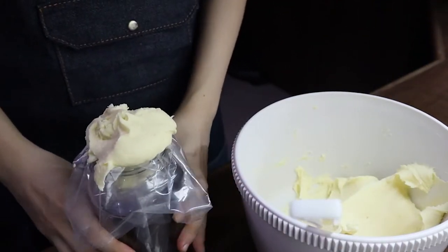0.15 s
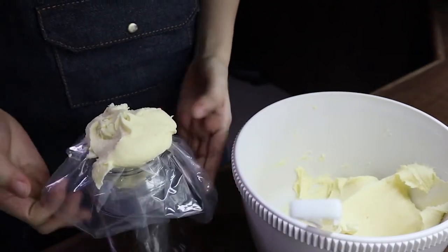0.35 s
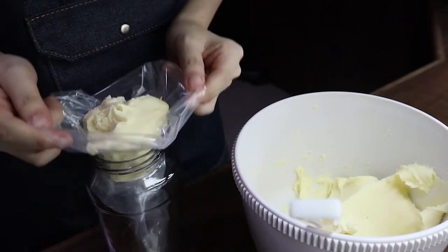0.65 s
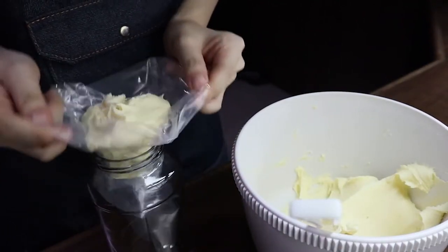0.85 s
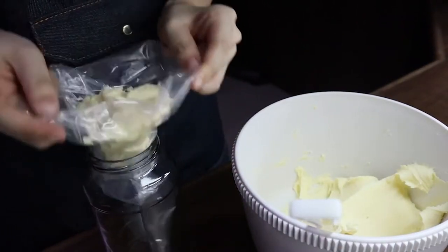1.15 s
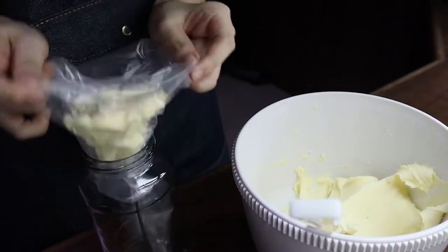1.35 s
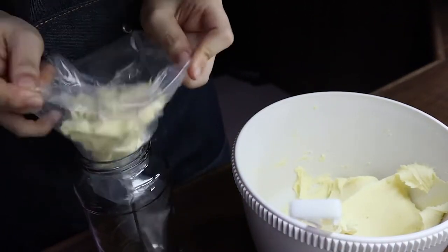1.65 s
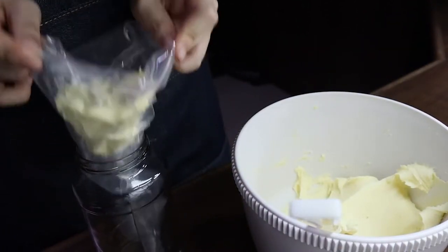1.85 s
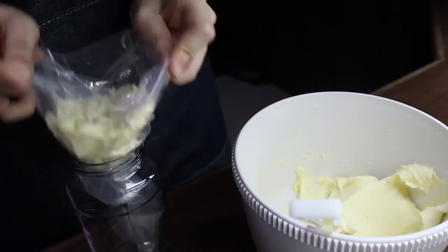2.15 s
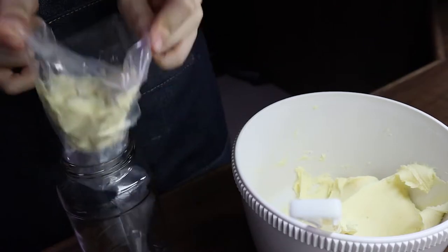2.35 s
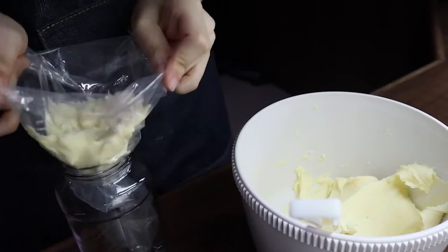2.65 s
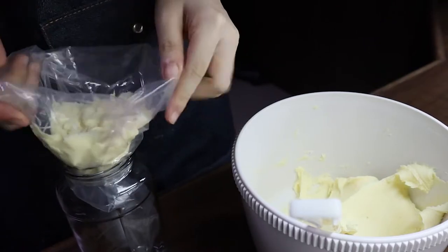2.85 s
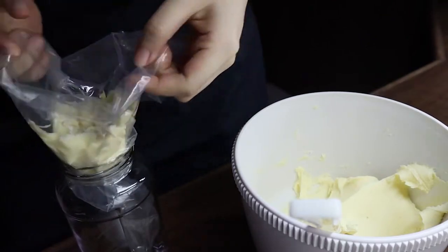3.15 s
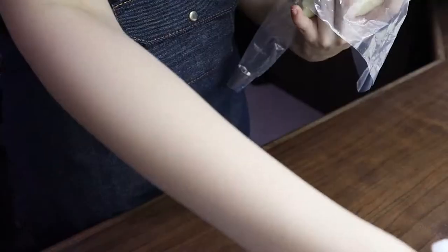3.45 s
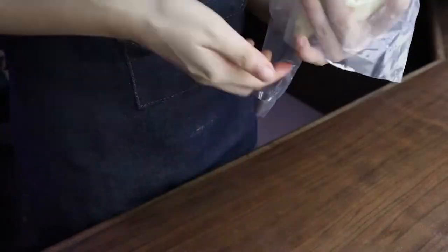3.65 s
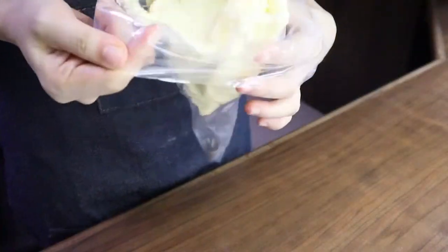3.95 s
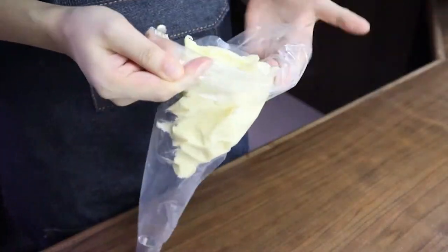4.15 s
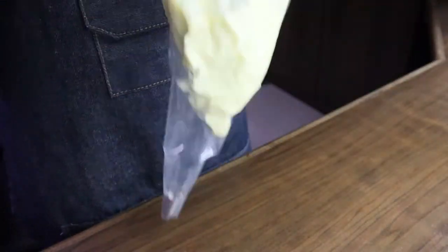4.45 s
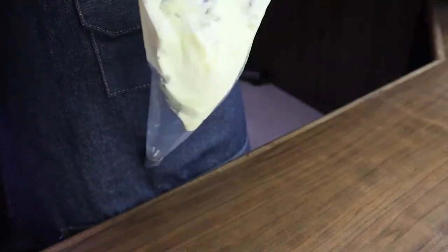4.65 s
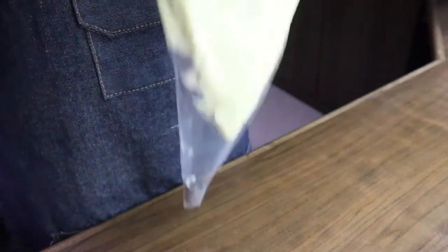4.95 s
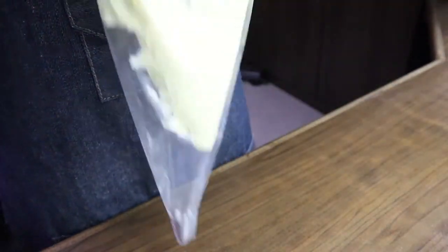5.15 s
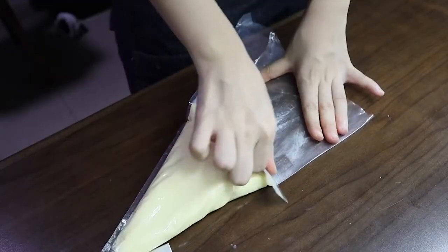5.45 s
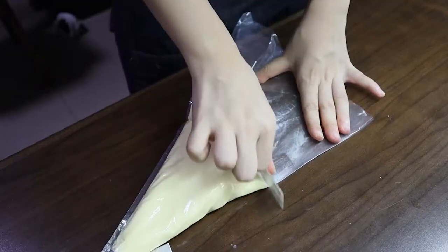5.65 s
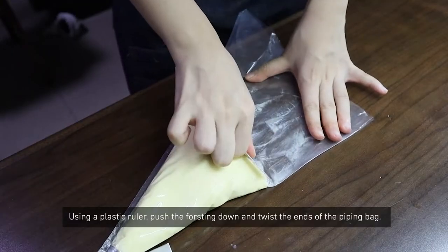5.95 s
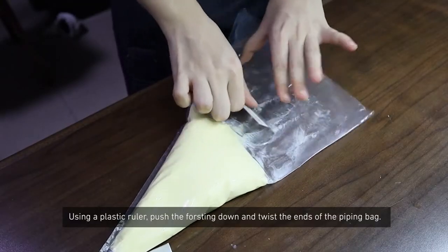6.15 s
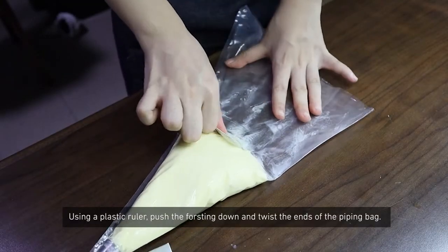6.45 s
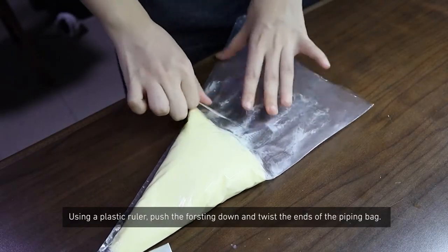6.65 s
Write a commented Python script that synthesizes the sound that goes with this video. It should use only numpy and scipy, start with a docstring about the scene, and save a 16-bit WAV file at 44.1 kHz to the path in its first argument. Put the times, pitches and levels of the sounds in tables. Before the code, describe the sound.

A jar knocks dully on a wooden table, with two heavy thumps at once. A thin plastic piping bag then rustles lightly and crinkles more densely over a low rumble. After a brief lull with soft bumps, it crackles loudly as it is shaken, then subsides to faint separate crinkles. Close stereo microphone, small kitchen, light background noise.

```python
"""A small kitchen: a thin plastic piping bag is pulled off a jar, shaken down and pressed flat on a wooden table.
Creases in the film buckle as bursts of uneven slips ringing a panel, over a bed of tiny crackles.
Dull noise-burst knocks, soft low bumps, a lumpy rumble through jar and table and background noise lie around them.
Diffuse echoes follow the bag and the knocks; two close microphone ports, a mains-hum filter, overload
and treble cuts shape the pickup.
"""
import sys
import numpy as np
from scipy import signal
from scipy.fft import rfft, irfft
from scipy.io import wavfile
from scipy.ndimage import uniform_filter1d

SR = 44100
rng = np.random.default_rng(int(sys.argv[2]) if len(sys.argv) > 2 else 0)


def store_pcm(level_fs):
    """Save levels as 16-bit WAV."""
    pcm = np.round(np.clip(level_fs, -1, 1) * 32767).astype(np.int16)
    wavfile.write(sys.argv[1], SR, np.atleast_2d(pcm).T)


N = 300321

# colour of the background noise: (pitch [Hz], relative level per Hz [dB])
BACKGROUND_COLOUR = [(15, -33), (25, -5.5), (97, 0.5), (361, -16.5), (641, -12), (2310, -20),
                     (10800, -46.5), (13000, -51)]
# background noise over time: (time [s], level [dB])
BACKGROUND_LEVEL = [(0, -31.5), (.4, -64), (1, -51.5), (3.6, -48.5), (5.5, -46.5), (6.81, -45)]
# jar knocks on the table: (time [s], drive level [dB], burst t60 [s])
JAR_KNOCKS = [(0.002, -10, 0.15), (0.101, 0.5, 0.034), (0.21, -12.5, 0.095), (0.778, -15.5, 0.072),
              (2.218, -13, 0.081)]
# colour of a knock: (pitch [Hz], relative level per Hz [dB])
KNOCK_COLOUR = [(41, -52), (70, 1), (572, 3.5), (1140, -2.5), (2040, -12), (4490, -28.5), (7000, -61.5),
                (9100, -88), (15400, -120)]
# colour of the rumble: (pitch [Hz], relative level per Hz [dB])
RUMBLE_COLOUR = [(15, -38), (25, -9), (54, -12.5), (144, 2), (426, -0.5), (560, -5), (1200, -12),
                 (1560, -11.5), (2640, -120)]
# rumble through jar and table, before its lumps: (time [s], level [dB])
RUMBLE_LEVEL = [(.3, -66), (.95, -48.5), (1.3, -39), (1.6, -30), (2.2, -31), (2.72, -31), (2.85, -50.5),
                (3.4, -50.5), (3.8, -58), (4.45, -47), (4.55, -30.5), (4.75, -64.5), (5.1, -42.5),
                (5.4, -38.5), (5.5, -67), (6.81, -70)]
# spells of handling, each a run of crackle: (start [s], end [s], drive at start [dB], drive at end [dB])
HANDLING_SPELLS = [(0.395, .49, -43.5, -43), (0.527, 0.645, -29.5, -38.5), (0.734, 0.727, -47, -42),
                   (0.814, 0.943, -39, -48.5), (1.0, 2.698, -33, -25), (2.727, 2.996, -28, -51.5),
                   (2.992, 3.155, -42.5, -25.5), (3.23, 3.306, -35, -35.5), (3.365, 3.462, -29, -34.5),
                   (3.5, 3.585, -64, -44.5), (3.77, 3.824, -43.5, -34), (3.877, 4.275, -21, -39),
                   (4.37, 4.36, -24, -28), (4.446, 4.442, -17, -36), (4.505, 4.852, -33, -31.5),
                   (4.892, 5.37, -27.5, -30.5), (5.47, 5.595, -35, -57), (5.828, 5.913, -41.5, -37),
                   (6.083, 6.197, -42.5, -40), (6.305, 6.436, -27.5, -44), (6.567, 6.77, -35, -35.5)]
# centre of the crackle's pitch spread: (time [s], pitch [Hz])
CRACKLE_CENTRE = [(0, 2320), (1, 2340), (2.6, 2040), (3, 2360), (5.4, 2040), (5.6, 2580)]
# creases that snap at once: (time [s], panel level [dB], panel pitch [Hz], treble level [dB])
CREASE_SNAPS = [(0.426, -36, 2240, -36), (.449, -36, 2510, -40), (0.5029, -37, 2140, -28),
                (0.58, -26.5, 2300, -24), (0.5422, -29.5, 2150, -33), (0.632, -29, 2460, -32),
                (0.7239, -32, 2280, -27.5), (.836, -20, 2660, -21), (0.8944, -29.5, 2430, -27.5),
                (0.992, -30, 3300, -19), (1.1236, -22.5, 1770, -19), (1.2351, -28.5, 2500, -35.5),
                (1.3543, -26.5, 1650, -47), (1.394, -25, 1650, -23), (1.446, -19.5, 2060, -20),
                (1.4525, -23.5, 2480, -16.5), (1.6963, -17.5, 2400, -21.5), (1.8195, -14, 2420, -16),
                (1.893, -13, 1750, -39), (2.0221, -10, 2120, -34), (2.036, -29, 1990, -21),
                (2.1395, -20, 1620, -23.5), (2.181, -24.5, 2490, -41), (2.2792, -14.5, 2310, -12),
                (2.316, -20.5, 1890, -30), (2.3527, -15, 1500, -26), (2.4301, -14, 1990, -23),
                (2.5235, -15, 1950, -11), (2.6078, -15.5, 1880, -11.5), (2.6351, -14, 1790, -11),
                (2.686, -14, 2200, -9.5), (2.9248, -24.5, 1170, -29.5), (3.018, -26.5, 2660, -28),
                (3.032, -30, 2670, -20), (3.0853, -24.5, 2650, -25), (3.103, -27, 2480, -33),
                (3.1196, -17, 2480, -21.5), (3.2481, -21.5, 3100, -23.5), (3.284, -27, 3340, -28),
                (3.3, -41, 2830, -27), (3.3693, -30, 2420, -16.5), (3.4065, -23, 2740, -15.5),
                (3.463, -26, 2700, -33), (3.8376, -22.5, 2110, -19), (3.9102, -14.5, 2140, -20),
                (3.942, -19, 1870, -35), (3.9659, -13.5, 2450, -24), (4.0021, -15, 2200, -22),
                (4.0374, -19, 2550, -17.5), (4.0607, -15, 2200, -34), (4.1139, -19.5, 2540, -19.5),
                (4.273, -17.5, 3230, -19), (4.323, -16, 2380, -24), (4.419, -15.5, 2600, -19),
                (4.49, -12.5, 2160, -17.5), (4.528, -11, 2600, -30), (4.462, -12, 2570, -22),
                (4.6649, -18, 2050, -36), (4.706, -20.5, 2440, -42), (4.87, -20.5, 2670, -24.5),
                (4.9151, -14, 2570, -32), (4.9906, -10, 2020, -14.5), (4.981, -18, 2300, -35),
                (5.001, -19, 2300, -24), (5.1942, -12, 2210, -40), (5.2111, -10.5, 1830, -14),
                (5.318, -4, 1980, -16), (5.36, -11.5, 2320, -25), (5.404, -15.5, 1500, -28),
                (5.8263, -31, 2800, -27), (5.9141, -23.5, 2630, -49), (6.072, -48, 1920, -24.5),
                (6.088, -34, 2630, -25), (6.1111, -22, 2430, -22.5), (6.314, -19, 2840, -40),
                (6.3464, -53, 2920, -25), (6.4102, -38.5, 3540, -25.5), (6.6278, -26.5, 2340, -33),
                (6.74, -17.5, 2500, -24), (6.78, -24.5, 2420, -42)]
# creases that swell to a peak:
# (peak time [s], panel level [dB], panel pitch [Hz], treble level [dB], fall t60 [s])
CREASE_CRUMPLES = [(1.319, -25.5, 2200, -27, 0.03), (1.496, -20.5, 2200, -48, .024),
                   (1.526, -21.5, 2000, -35, 0.021), (1.5723, -16, 1720, -27, 0.028),
                   (1.6522, -20.5, 1580, -32, .025), (1.7396, -14.5, 2100, -44, 0.031),
                   (1.87, -20.5, 2320, -30, 0.075), (1.979, -13, 1970, -19, 0.058),
                   (2.0537, -15, 1890, -25, 0.03), (2.1003, -22.5, 1920, -46, 0.031),
                   (2.2188, -12, 1990, -23, 0.027), (2.3672, -29, 2150, -14.5, 0.023),
                   (2.3998, -13.5, 1930, -29, 0.042), (2.4749, -15, 1930, -24.5, 0.048),
                   (2.5573, -14, 1470, -22, .036), (3.216, -33.5, 3440, -27, 0.042),
                   (4.2099, -20, 2800, -22.5, 0.043), (4.3396, -4, 2430, -5, 0.025),
                   (4.4291, -9.5, 1730, -24, .028), (4.5075, -6, 1740, -16, 0.055),
                   (4.5714, -8, 1800, -16.5, 0.018), (4.633, -13.5, 1980, -20, 0.025),
                   (4.957, -8.5, 1610, -18, 0.046), (5.044, -8, 1750, -24.5, 0.052),
                   (5.1006, -8.5, 2080, -20, 0.024), (5.1635, -4, 2180, -9.5, .027),
                   (5.2468, -9.5, 1980, -19.5, 0.071), (5.2768, -14.5, 2320, -23, 0.022),
                   (5.332, -12, 1500, -26, 0.064), (5.3894, -5.5, 1840, -13, 0.03),
                   (5.463, -19.5, 2750, -29, 0.02), (5.8862, -28.5, 3050, -30.5, 0.064),
                   (6.332, -30.5, 2830, -41, .05), (6.685, -28, 2480, -29.5, 0.027),
                   (6.744, -19.5, 2570, -31, 0.08)]
# where the bag is held: (time [s], left minus right [dB])
BAG_LEAN = [(0, -0.7), (2.6, .5), (4, -0.7), (6.81, -1.8)]
# soft bumps of bowl, filling and hands: (time [s], drive level [dB], pitch [Hz], t60 [s])
SOFT_BUMPS = [(3.487, -25.5, 370, 0.11), (3.546, -33, 350, 0.1), (3.582, -27.5, 282, 0.047),
              (4.497, -29, 91, 0.21), (4.975, -24, 34.5, 0.17), (5.041, -23, 71, 0.28),
              (5.113, -33, 113, 0.36), (6.275, -33.5, 49.6, .2)]

CRACK_DB, CRACK_T60_S = -27.5, 0.012   # bright edge of a knock, relative to its drive level
KITCHEN_T60_S, WALL_CUT_HZ = 0.2, 6600
BAG_ECHO_DB, KNOCK_ECHO_DB = -14, -6   # sends into the kitchen echoes
CRACKLES = 6000   # count
SWELL_DB_PER_S, FADE_DB_PER_S, REST_DB = 399, 330, -61.5   # crackle drive before, after and between spells
SNAP_RISE_T60_S, SNAP_FALL_T60_S = 0.0046, 0.016
CRUMPLE_RISE = 0.71   # rise time over fall time
GENTLE_NARROWS = 1.0357   # a crease rings this many times narrower for each dB it is gentler
GIVE_DB = 14   # the slip as a crease gives way, above a typical other slip
NEIGHBOUR_DB, NEIGHBOUR_OCTAVES = -4, 0.64   # neighbouring panel: gain and random pitch spread
PORT_RING_HZ, PORT_RING_Q = 10300, 3.5
PORT_TURN_RAD, PORT_APART_HZ = 0.85, 3500   # left-right phase spread, reached well above this pitch
MAINS_HZ, NOTCH_WIDTH_HZ = 60, 24.7
CUTOFF_HZ = 13200


def from_db(db):
    """dB to gain."""
    return 10 ** (np.asarray(db) / 20)


def rms_one(x):
    """Scale to rms 1."""
    return x / np.sqrt(np.mean(x ** 2) + 1e-20)


def butter(x, hz, kind, order=2):
    """Butterworth filter along time."""
    return signal.sosfilt(signal.butter(order, hz, kind, fs=SR, output="sos"), x)


def coloured(x, tone):
    """Give white noise the spectrum of a colour table, joined along log pitch."""
    hz, db = np.transpose(tone)
    grid = np.arange(N // 2 + 1) * SR / N + 1
    gain = from_db(np.interp(np.log(grid), np.log(hz), db))
    return irfft(rfft(x) * gain, N)


def ports(hz_apart):
    """White noise that both ports nearly share in the bass and hear differently in the treble."""
    mid, side = rng.standard_normal((2, N))
    difference = butter(side, hz_apart, "high", order=1) + from_db(-27) * side
    return mid + difference * [[1], [-1]]


def background_noise():
    """Background: coloured noise that sinks quickly after the first knocks, partly recovers, then rises slowly."""
    level_db = np.interp(np.arange(N) / SR, *np.transpose(BACKGROUND_LEVEL))
    return from_db(level_db) * rms_one(coloured(ports(4900), BACKGROUND_COLOUR))


def knocks():
    """Dull blows: coloured noise that starts within a millisecond or two and dies fast, with a bright edge."""
    t, envelope, edge = np.arange(N) / SR, np.zeros(N), np.zeros(N)
    for s, drive_db, t60 in JAR_KNOCKS:
        envelope += (t >= s) * from_db(drive_db - 4.0 - 60 * np.abs(t - s) / t60)
        edge += (t >= s) * from_db(drive_db + CRACK_DB - 60 * np.abs(t - s) / CRACK_T60_S)
    crack = edge * rms_one(butter(ports(6400), [1200, 4500], "band"))
    soft_attack = butter(envelope, 290, "low")
    return soft_attack * rms_one(coloured(ports(7700), KNOCK_COLOUR)) + crack


def kitchen(x):
    """Diffuse echoes that start after 4 ms and die away, dulled by the walls."""
    t = np.arange(SR // 2) / SR
    tail = butter(ports(7900)[:, :len(t)], WALL_CUT_HZ, "low", order=1)
    tail = tail * from_db(-60 * t / KITCHEN_T60_S) * (t > .004)
    return signal.fftconvolve(x.mean(0)[None], rms_one(tail) / np.sqrt(len(t)))[:, :N]


def rumble():
    """Rumble through jar and table: coloured noise whose level wanders in slow random lumps."""
    lumps = rms_one(butter(rng.standard_normal(N), 16, "low"))
    level_db = np.interp(np.arange(N) / SR, *np.transpose(RUMBLE_LEVEL), left=-70)
    level_db = level_db + 4.35 * np.clip(lumps, -2, 2)
    return from_db(level_db) * rms_one(coloured(ports(6000), RUMBLE_COLOUR))


def handling_db(at):
    """Each spell swells in, slides from its first level to its last and fades; the loudest spell counts."""
    spells = []
    for start, end, first_db, last_db in HANDLING_SPELLS:
        slide = np.interp(at, [start, end], [first_db, last_db])
        swell = SWELL_DB_PER_S * np.maximum(start - at, 0)
        fade = FADE_DB_PER_S * np.maximum(at - end, 0)
        spells.append(slide - swell - fade)
    return np.maximum(np.max(spells, axis=0), REST_DB)


def resonance(f, hz, q):
    """Frequency response of a band-pass resonance with unit gain at its pitch."""
    return 1j * f / hz / q / (1 - (f / hz) ** 2 + 1j * f / hz / q)


def loudest(x, size):
    """Rms of the loudest 3 ms of each spectrum's sound."""
    power = uniform_filter1d(irfft(x, size) ** 2, size=132)
    return np.sqrt(power.max(1, keepdims=True))


def buckles(s, panel_db, panel_hz, bright_db, rise_t60, fall_t60, panel_q, skirt_q, spiky_db, size):
    """Each buckle is a swell of uneven slips that rings a film panel and the port cavity, from its own side."""
    top = size // 3   # sample where the crease gives way
    t, f = (np.arange(size) - top) / SR, np.arange(size // 2 + 1) * SR / size
    draw = rng.standard_normal((len(s), 2 * size + 1))
    t60 = np.where(t < 0, rise_t60[:, None], fall_t60[:, None])
    draw[:, top], draw[:, size + top] = from_db(GIVE_DB), 0
    slip_db = spiky_db * draw[:, size:-1] - 60 * np.abs(t) / t60
    slips = rfft(draw[:, :size] * from_db(slip_db))

    pitch = panel_hz[:, None]
    panel = resonance(f, pitch, panel_q) * resonance(f, pitch, skirt_q)
    # strong buckles move all the bag
    whole_bag = from_db(-9.5 + 0.72 * (panel_db + 11.0))[:, None] * resonance(f, 580, 1.48) ** 2
    neighbour_hz = pitch * 2 ** (NEIGHBOUR_OCTAVES * draw[:, :1])
    neighbour = from_db(NEIGHBOUR_DB) * resonance(f, neighbour_hz, 4.6)
    film = slips * (panel - whole_bag - neighbour)
    port = slips * (resonance(f, PORT_RING_HZ, PORT_RING_Q) + 0.15) * resonance(f, 5020, 1.0)
    sound = film / loudest(film, size) * from_db(panel_db)[:, None]
    sound = sound + port / loudest(port, size) * from_db(bright_db)[:, None]

    at = (np.round(s * SR).astype(int)[:, None] + np.arange(size)).ravel()
    turn = PORT_TURN_RAD * draw[:, -1:] / (1 + (PORT_APART_HZ / (f + 1)) ** 2)
    out = []
    for side in (1, -1):   # left, right
        heard = irfft(sound * np.exp(-1j * side * turn), size)
        out.append(np.bincount(at, heard.ravel(), N + size)[top:N + top])
    return np.array(out)


def crackle():
    """Small buckles at random moments, with level rising and falling in clumps; few are large, most are tiny."""
    draw = rng.random((CRACKLES, 4))
    clumps = rms_one(butter(rng.standard_normal(N), 25.6, "low"))
    at = draw[:, 0] * (N - 1) / SR
    clump = clumps[(at * SR).astype(int)]
    base_db = handling_db(at) - 12 - 2.6 * np.log(draw[:, 1] + 0.01)
    bright_db = base_db - 9.0 + 4.1 * clump + 9 * (draw[:, 2] - .5)
    panel_db = base_db + 4.46 * clump
    pitch_hz = np.interp(at, *np.transpose(CRACKLE_CENTRE)) * 2.05 ** (draw[:, 3] - .5)
    rise_t60, fall_t60 = np.full(CRACKLES, 0.00065), np.full(CRACKLES, 0.0067)
    return buckles(at, panel_db, pitch_hz, bright_db, rise_t60, fall_t60,
                   panel_q=2.48, skirt_q=0.14, spiky_db=-2.0, size=384)


def creases():
    """The large buckles: snaps share one rise and fall, a crumple's rise scales with its fall."""
    snaps = [(*row, SNAP_RISE_T60_S, SNAP_FALL_T60_S) for row in CREASE_SNAPS]
    crumples = [(*row, CRUMPLE_RISE * fall, fall) for *row, fall in CREASE_CRUMPLES]
    rows = np.transpose(snaps + crumples)
    narrow = GENTLE_NARROWS ** -rows[1][:, None]
    return buckles(*rows, panel_q=1.15 * narrow, skirt_q=0.12 * narrow, spiky_db=6.0, size=4096)


def bumps():
    """A soft contact: one low wavering ring of narrow noise that swells for half a cycle and dies."""
    out, t = np.zeros(N), np.arange(SR // 2) / SR
    for s, drive_db, hz, t60 in SOFT_BUMPS:
        noise = rms_one(butter(rng.standard_normal(SR), [hz / 1.3, hz * 1.3], "band"))
        noise = noise[SR // 2:]   # skip the filter's settling
        envelope = np.minimum(2 * hz * t, 1) * from_db(drive_db - 1.0 - 60 * t / t60)
        out[round(s * SR):][:len(t)] += noise * envelope
    return out


def scene():
    """Bag and knocks with their kitchen echoes, plus bumps, rumble and background noise."""
    lean_db = np.interp(np.arange(N) / SR, *np.transpose(BAG_LEAN)) / 2
    bag = (creases() + crackle()) * from_db([lean_db, -lean_db])
    blows = knocks()
    echoes = kitchen(from_db(BAG_ECHO_DB) * bag + from_db(KNOCK_ECHO_DB) * blows)
    return bag + blows + echoes + bumps() + (rumble() + background_noise())


def record(dry):
    """Notches on the first eight mains multiples, hard overload, softened treble and steep top cuts."""
    for k in range(1, 9):
        hz = k * MAINS_HZ
        dry = signal.lfilter(*signal.iirnotch(hz, hz / NOTCH_WIDTH_HZ, SR), dry)
    overloaded = np.clip(dry, -1, 1)
    softened = butter(overloaded, 12300, "low", order=3)
    cut = butter(softened, 15800, "low", order=16)
    return signal.sosfilt(signal.cheby2(6, 14, CUTOFF_HZ, fs=SR, output="sos"), cut)


dry = scene()
out = record(dry)
store_pcm(out)
```